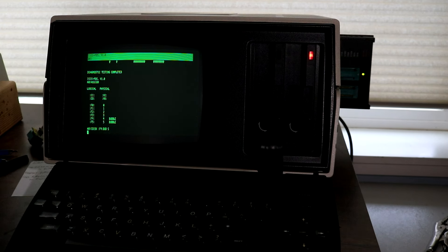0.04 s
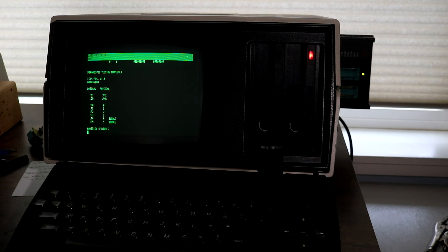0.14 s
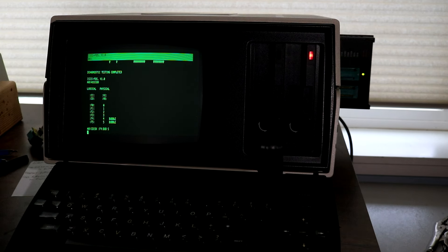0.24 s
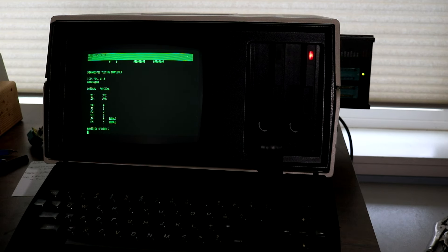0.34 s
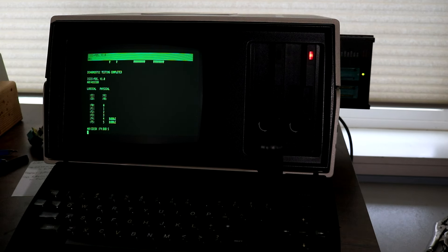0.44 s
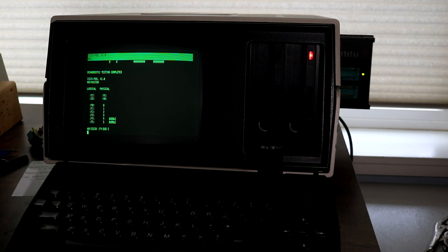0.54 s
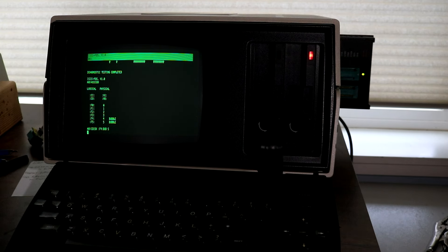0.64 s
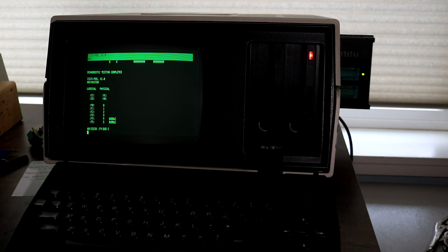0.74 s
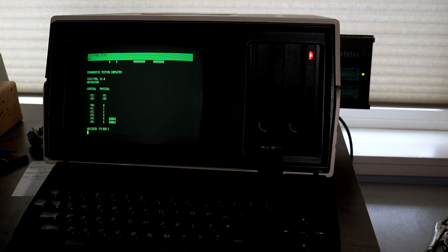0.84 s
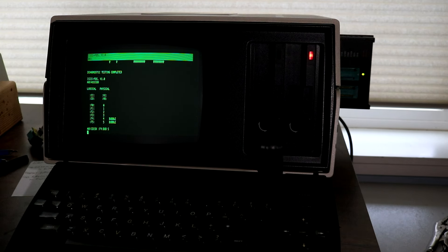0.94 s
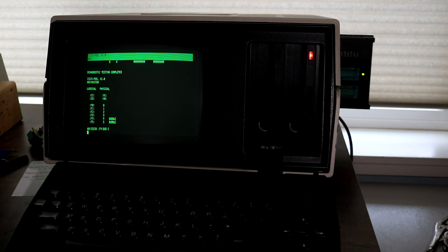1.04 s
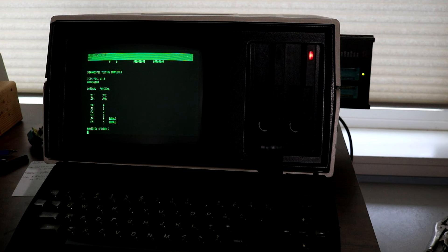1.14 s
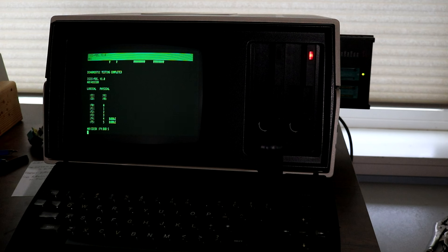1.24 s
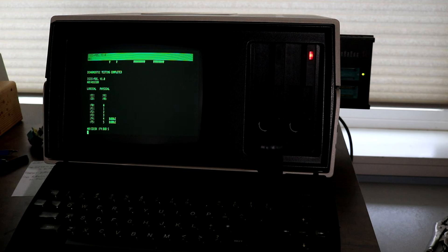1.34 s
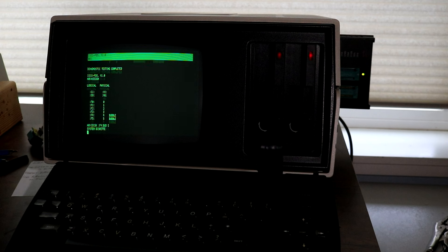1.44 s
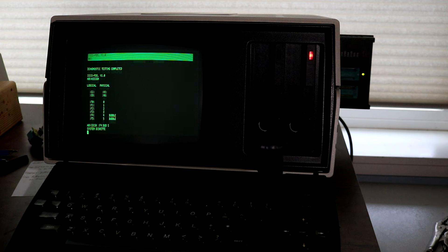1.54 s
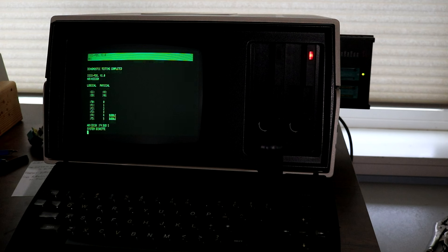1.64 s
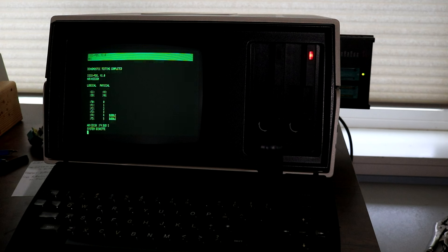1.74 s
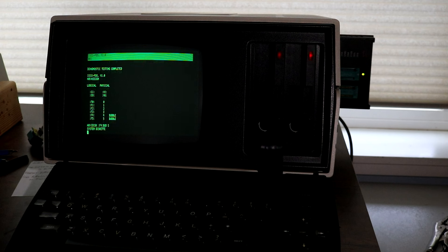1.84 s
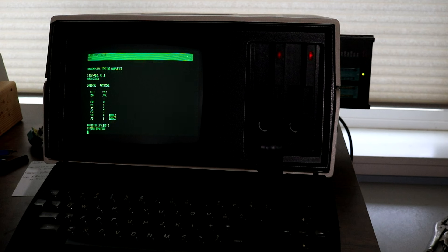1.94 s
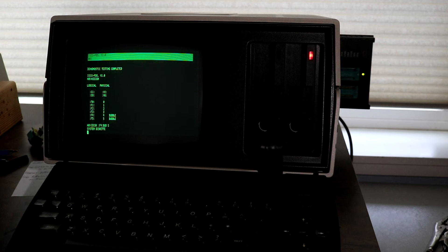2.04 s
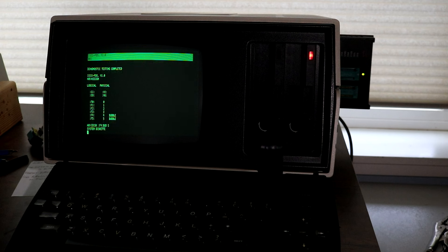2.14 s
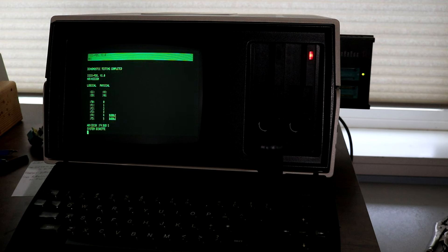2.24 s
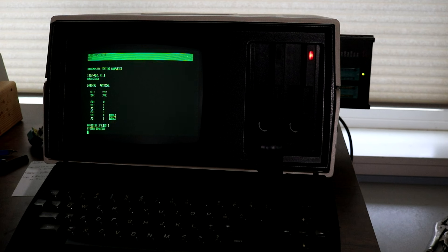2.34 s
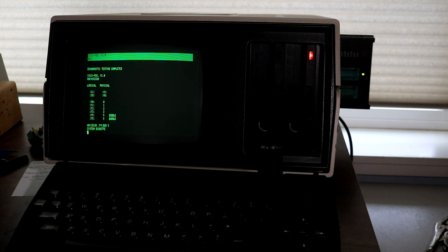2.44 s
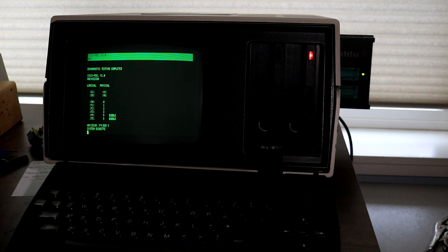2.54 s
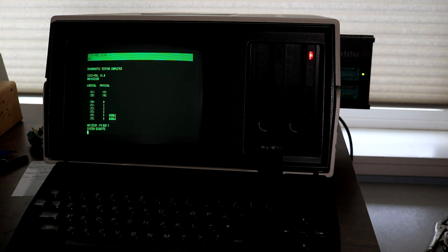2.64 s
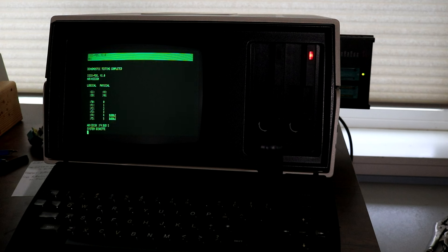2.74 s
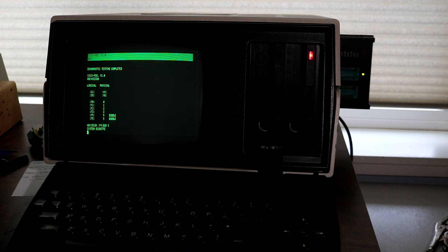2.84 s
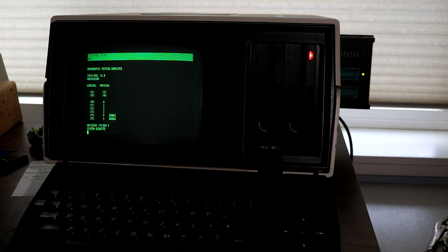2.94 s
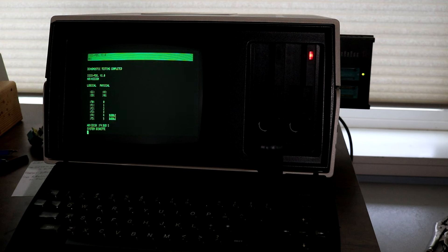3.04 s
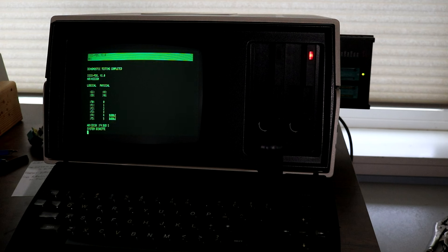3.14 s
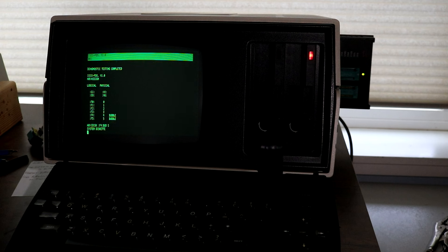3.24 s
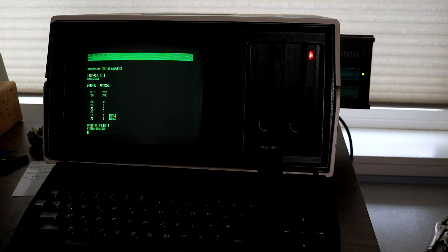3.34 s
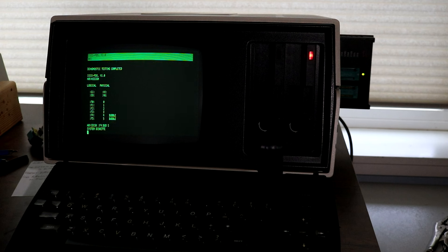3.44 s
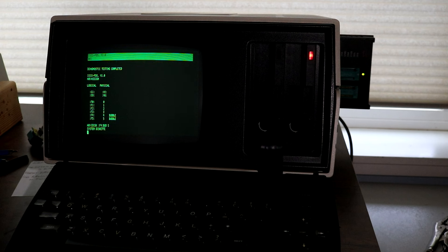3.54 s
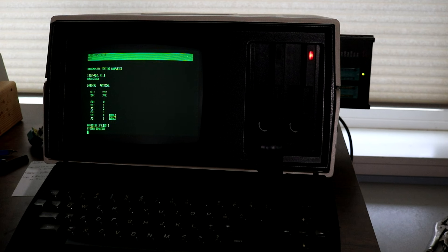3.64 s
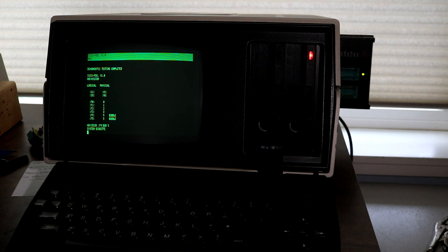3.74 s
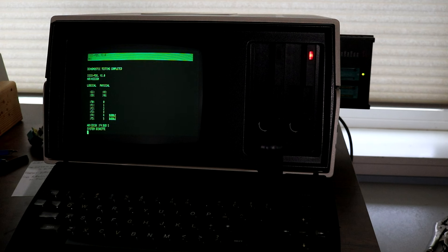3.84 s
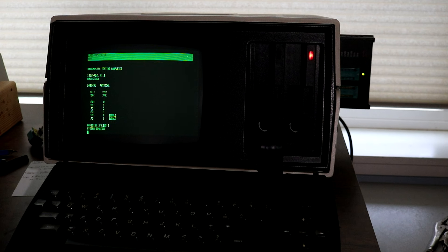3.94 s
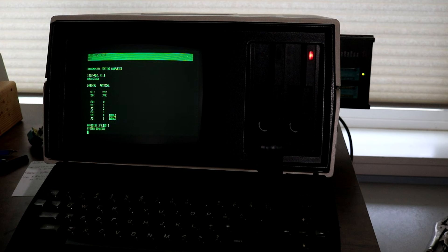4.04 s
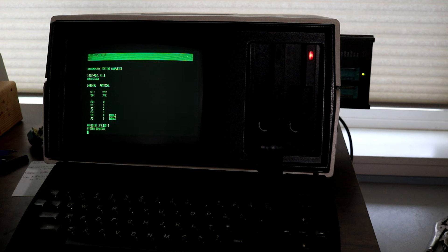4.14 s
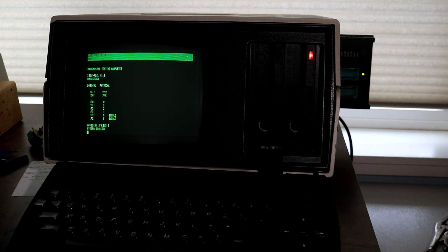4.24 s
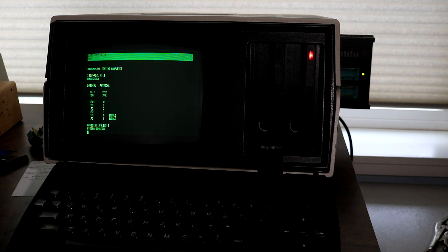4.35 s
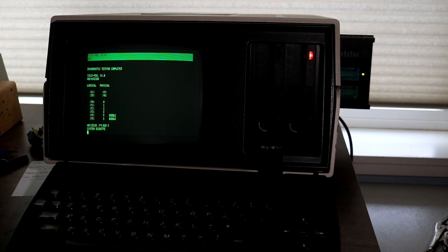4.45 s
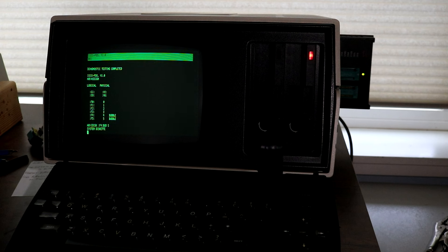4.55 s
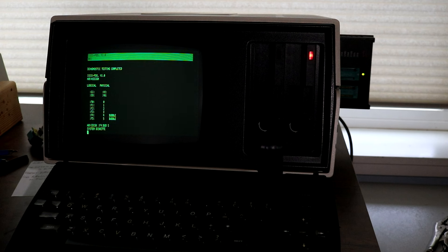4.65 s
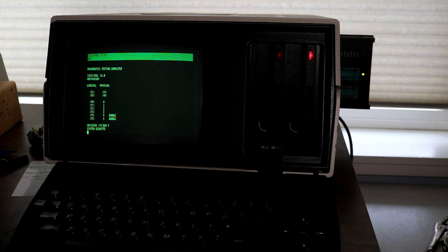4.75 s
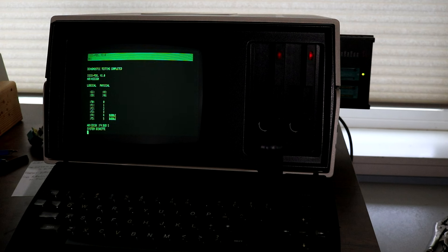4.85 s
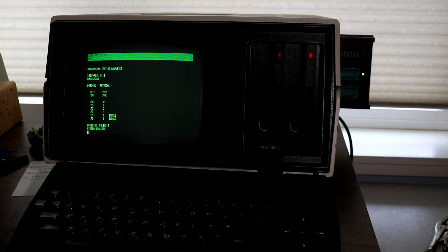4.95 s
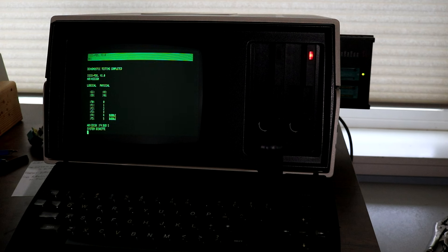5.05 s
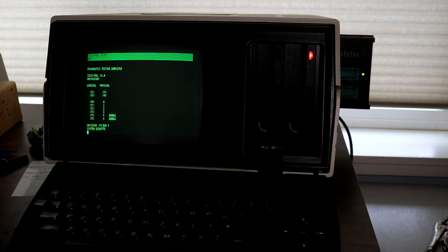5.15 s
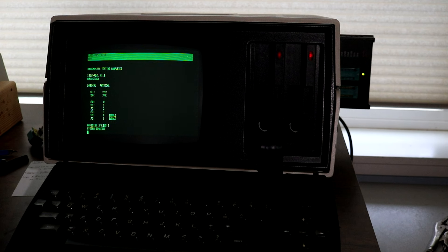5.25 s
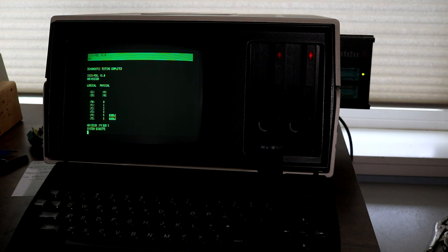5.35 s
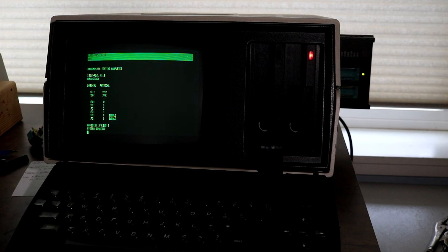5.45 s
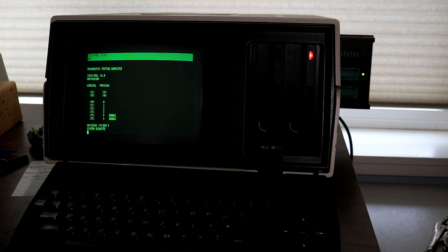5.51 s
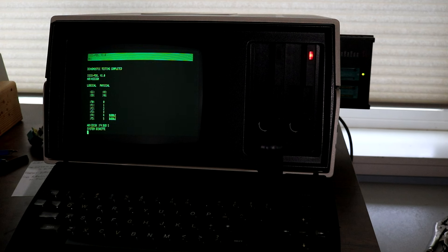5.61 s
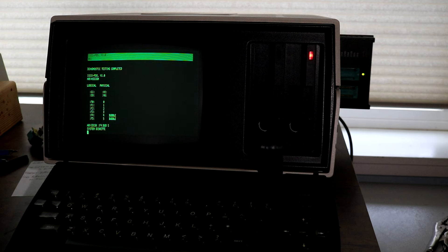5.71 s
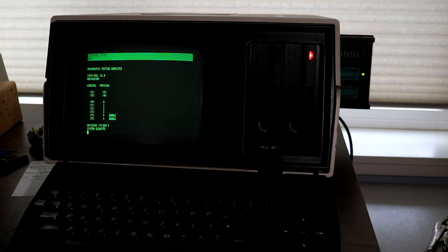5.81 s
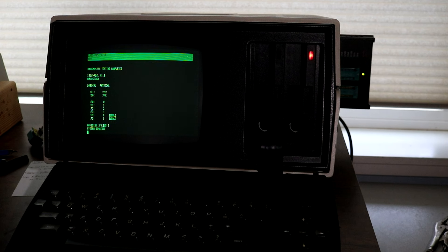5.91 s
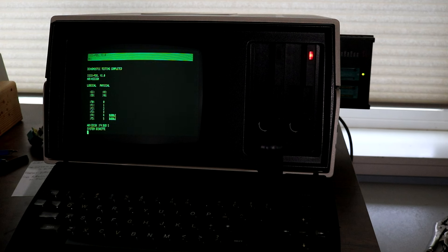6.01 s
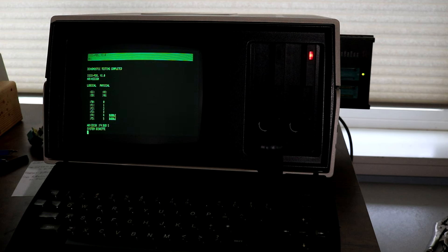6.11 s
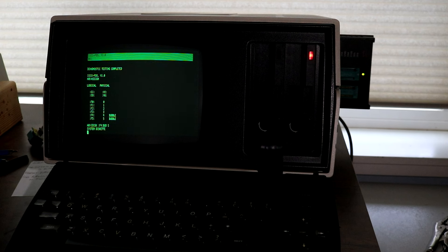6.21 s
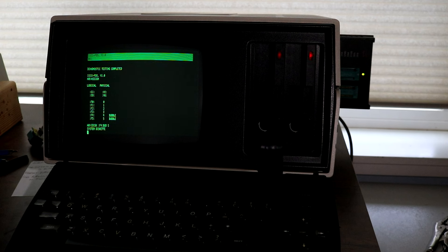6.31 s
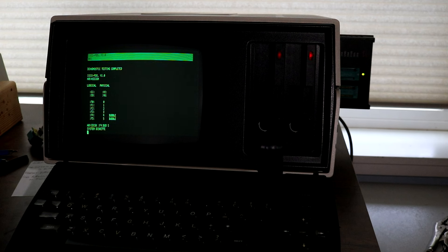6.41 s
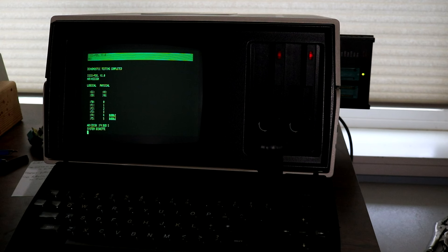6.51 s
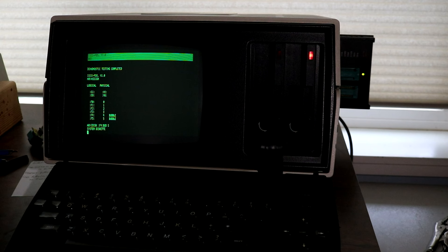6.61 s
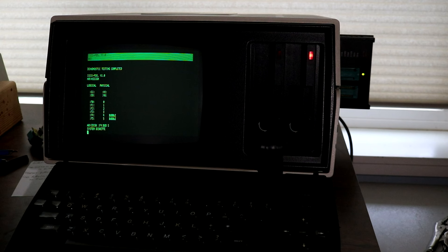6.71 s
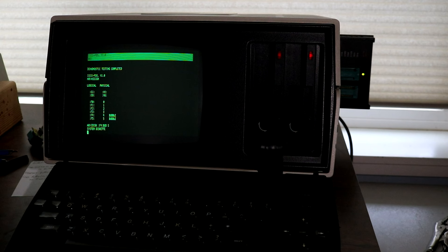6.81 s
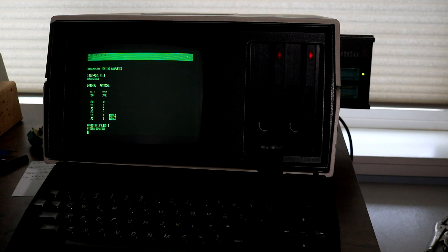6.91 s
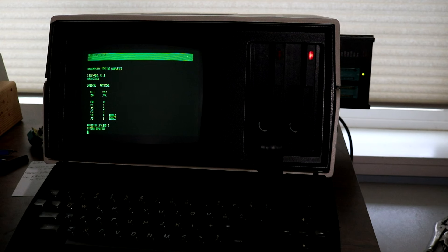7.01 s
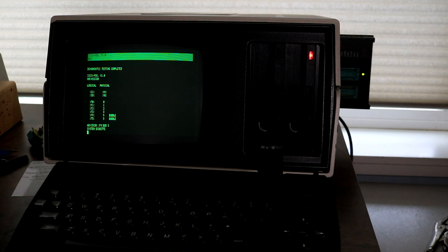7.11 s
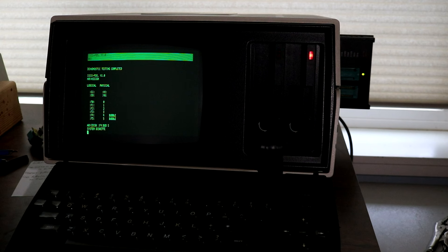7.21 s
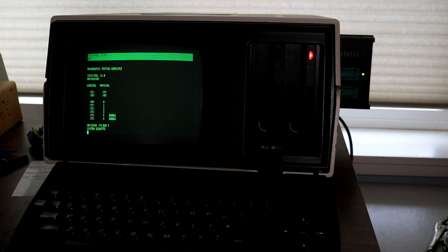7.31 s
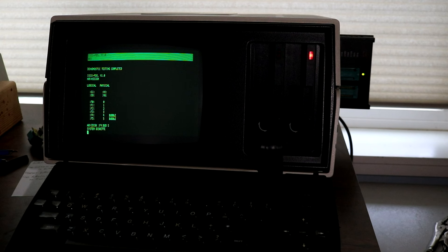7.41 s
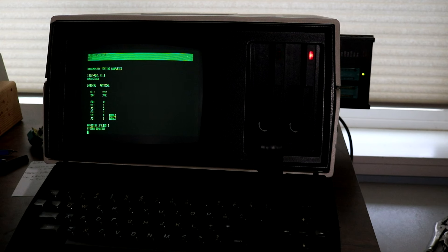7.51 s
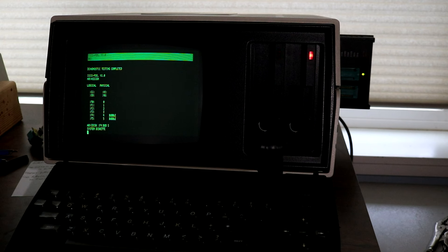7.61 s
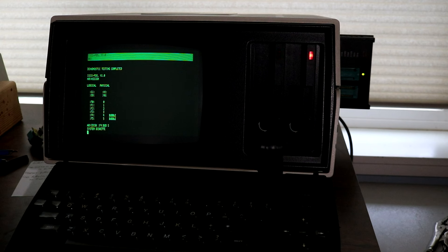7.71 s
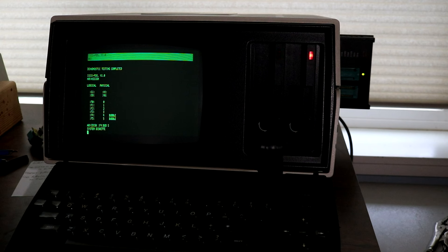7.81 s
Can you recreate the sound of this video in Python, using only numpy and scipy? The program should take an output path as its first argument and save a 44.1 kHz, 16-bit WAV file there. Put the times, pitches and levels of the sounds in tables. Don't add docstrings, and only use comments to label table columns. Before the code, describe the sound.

An old portable computer's floppy drive gives short buzzing seeks ending in sharp loud clacks, over steady fan rush, faint hum and high screen whine.

```python
import sys
import numpy as np
from scipy import signal
from scipy.fft import rfft, irfft, next_fast_len
from scipy.io import wavfile
from scipy.ndimage import uniform_filter1d

SR = 44100
rng = np.random.default_rng(int(sys.argv[2]) if len(sys.argv) > 2 else 0)


def output_pcm(signal):
    pcm = np.clip(np.atleast_2d(signal).T, -1, 1) * 32767
    wavfile.write(sys.argv[1], SR, np.round(pcm).astype(np.int16))


def elevation(decibels):
    levels = np.asarray(decibels, float)
    return 10 ** (levels / 20)


N = 347067


def evened(x):
    return x / np.sqrt(np.mean(x ** 2) + 1e-20)


def read(points, hz):
    f, value = np.transpose(points)
    return np.interp(np.log(hz + 1), np.log(f + 1), value)


def add(mix, s, sound):
    part = mix[round(s * SR):][:len(sound)]
    part += sound[:len(part)]


def colour(x, points):
    hz = np.fft.rfftfreq(x.shape[-1], 1 / SR)
    return irfft(rfft(x) * elevation(read(points, hz)), x.shape[-1])


def ring(x, hz, width):
    return signal.lfilter(*signal.iirpeak(hz, hz / max(width, 5), SR), x)


def drift(count, hz):
    return evened(signal.lfilter(*signal.butter(2, hz, fs=SR), rng.standard_normal(count), axis=-1))


def likeness(z, same):
    same = np.clip(same, -1, 1)[:, None]
    return np.array([z[0], same * z[0] + np.sqrt(1 - same ** 2) * z[1]])


def gate(t, length, rise_s, fall_s):
    rise = 1 - np.exp(-t / max(rise_s, 1e-4))
    return rise * np.exp(-np.maximum(t - length, 0) / max(fall_s, 1e-4))


def monitor():
    whistle_hz = 15600.7
    phase = 2 * np.pi * whistle_hz * np.arange(N) / SR + np.array([[.8], [0]])
    return elevation([[-39.5], [-53.2]] + .2 * drift((2, N), 4)) * np.sin(phase)


# pitch_hz, level_db per Hz
FAN_COLOUR = [(15, -55.5), (25, -41), (63, -18.5), (95, -7), (127, -5), (189, -10), (240, -8), (934, -14),
              (1040, -13.5), (1590, -21), (2190, -20.5), (2710, -24.5), (9990, -35), (14500, -36.5)]
# pitch_hz, likeness (0 to 1)
FAN_COHERENCE = [(60, 0.86), (180, 0.86), (550, 0.75), (1650, 0.026), (4970, 0.026), (15000, 0.2)]
# pitch_hz, left_minus_right_db
FAN_BALANCE = [(60, -4), (400, -1), (1300, -2.5), (2400, -3.5), (4400, -1.5), (8000, 0.5)]


def fan():
    rush_db, hum_hz = -46.5, 120
    frames, hz = N // 512 + 5, np.fft.rfftfreq(2048, 1 / SR)
    a, b, c, d, patches = rng.standard_normal((frames, 1025, 5)).T
    patches = evened(uniform_filter1d(uniform_filter1d(patches, 14, 0), 6, 1))
    z = likeness([a + 1j * b, c + 1j * d], read(FAN_COHERENCE, hz))
    z = z * elevation(read(FAN_COLOUR, hz)[:, None] + 0.61 * patches)
    z *= elevation(np.outer([.5, -.5], read(FAN_BALANCE, hz)))[:, :, None]
    rush = elevation(rush_db) * evened(signal.istft(z, nperseg=2048, noverlap=1536)[1][:, :N])
    duct = elevation(-51) * evened(ring(ring(rng.standard_normal(N), 171, 37), 171, 37))
    hum = elevation(-47 + 0.71 * drift(N, 4.8)) * np.sin(2 * np.pi * hum_hz * np.arange(N) / SR)
    return rush + (hum + duct) * elevation([[-.5], [.5]])


# start_s, length_s, level_db
STROKES = [
    (0.268, 0.12, -51),
    (.36, 0.29, -52),
    (.58, 0.21, -57),
]
# pitch_hz, level_db per Hz
SKIN_COLOUR = [(2000, -23), (4000, -6), (7000, -6.5), (12000, -7), (16000, -7.5)]
# start_s, level_db (peak), pitch_hz (centre), t60_s, ringing_share
TICKS = [
    (0.072, -34, 4400, 0.032, 3),
    (0.2543, -21, 8000, 0.067, 1.7),
    (0.2655, -19.5, 9100, 0.029, 1.7),
    (0.601, -37.5, 7870, 0.05, 2.5),
    (4.737, -36.5, 3480, 0.05, 1.5),
    (7.6714, -51, 3880, 0.05, 2.5),
]
# start_s, level_db (peak), pitch_hz (centre), t60_s, ringing_share
KEY_BODY = [
    (.077, -32.5, 750, 0.11, 30),
    (.258, -35.5, 1610, 0.11, 30),
]
# pitch_hz, level_db per Hz
PLASTIC_COLOUR = [(500, -30), (900, -3), (1600, -4), (3000, 4), (6500, 6), (9500, 5), (15000, -5.5)]


def hand():
    s, length, db = np.transpose(STROKES)[:, :, None]
    done = np.clip((np.arange(N) / SR - s) / length, 0, 1)
    slide = evened(colour(rng.standard_normal((2, N)), SKIN_COLOUR))
    out = slide * (elevation(db) * np.sin(np.pi * done ** 0.57)).sum(0)
    t = np.arange(4000) / SR
    for s, db, hz, t60, share in [*TICKS, *KEY_BODY]:
        burst = rng.standard_normal((2, len(t))) + 0.43 * rng.standard_normal(len(t))
        burst = evened(colour(burst, PLASTIC_COLOUR)) + share * ring(burst, hz, hz / 9)
        envelope = elevation(db - 8.0 - 60 * t / t60) * np.minimum(t / 0.0013, 1)
        add(out.T, s, (envelope * evened(burst)).T)
    return out


# pitch_hz, t60_s
ROOM_DECAY = [(250, 0.49), (1000, 0.39), (2000, 0.33), (4000, 0.33), (8000, 0.29), (14000, 0.19)]
# pitch_hz, likeness (0 to 1)
ROOM_COHERENCE = [(300, 1), (800, 0.34), (2000, 0), (5000, 0)]


def room(x):
    taps = np.zeros((2, SR // 2))
    at = np.arange(200, SR // 2 - 20, 20)
    at = at + rng.integers(0, 20, (2, len(at)))
    np.put_along_axis(taps, at, rng.choice([-1., 1.], at.shape), 1)
    hz, t, z = signal.stft(taps, SR, nperseg=256)
    decay = elevation(-60 * t / read(ROOM_DECAY, hz)[:, None])
    tail = signal.istft(likeness(z, read(ROOM_COHERENCE, hz)) * decay, SR, nperseg=256)[1]
    return signal.fftconvolve(x[None], tail / np.linalg.norm(tail[0]), axes=1)[:, :N]


# pitch_hz, left_minus_right_db
DRIVE_BALANCE = [(300, 0), (700, -2), (1300, -1.5), (2400, -5.5), (4400, -1.5), (8000, -4)]
# pitch_hz, lag_rad
DRIVE_LAG = [(300, 0), (1000, .25), (2500, .7), (4000, .75), (6500, 1.75), (10000, 2.2)]
# pitch_hz, level_db
DESK_SCATTER = [(1000, -16), (3000, -13), (6500, -9), (11000, -6)]


def placed(x):
    size = next_fast_len(N)
    hz = np.fft.rfftfreq(size, 1 / SR)
    half = elevation(read(DRIVE_BALANCE, hz) / 2)
    scatter = rng.standard_normal((2, 600)) * np.exp(-np.arange(600) / 130)
    scatter = rfft(scatter / np.linalg.norm(scatter[0]), size) * elevation(read(DESK_SCATTER, hz))
    gains = np.array([half * np.exp(-1j * read(DRIVE_LAG, hz)), 1 / half]) * (1 + scatter)
    return irfft(rfft(x, size) * gains, size)[:, :N]


# pitch_hz, width_hz, level_db
PLATE_MODES = [(2600, 83, -60), (2800, 580, -53), (3655, 97, 21.5), (4050, 108, 16.5), (4530, 220, 16),
               (5400, 210, 25.5), (6140, 180, 5), (6990, 240, 20.5), (9100, 500, -1.5), (10800, 600, 17.5)]
# start_s, level_db
BOUNCES = [
    (0, -20),
    (.0005, -7),
    (.001, -5),
    (.0018, 0),
    (.0028, -5),
    (.0038, -8),
]
# pitch_hz, level_db per Hz
CLACK_COLOUR = [(900, -23), (1500, -22), (2500, -13), (4000, -10), (7000, -10.5), (10000, -16),
                (15000, -24)]


def clack():
    t, blows = np.arange(2500) / SR, np.zeros(300)
    for s, db in BOUNCES:
        add(blows, s, elevation(db) * np.hanning(5))
    plate = sum(elevation(db) * np.exp(-np.pi * w * t) * np.sin(2 * np.pi * f * t) for f, w, db in PLATE_MODES)
    sound = np.convolve(blows, plate)[:len(t)]
    sound = signal.lfilter(*signal.butter(4, 2100, "high", fs=SR), sound)
    shudder = evened(colour(rng.standard_normal(len(t)), CLACK_COLOUR))
    shudder = shudder * np.minimum(t / .001, 1) * np.exp(-t / .007)
    crack = colour(1. * (np.arange(len(t)) == 90), CLACK_COLOUR)
    crack *= np.linalg.norm(shudder) / np.linalg.norm(crack)
    return sound / abs(sound).max() + .27 * shudder, crack + .3 * shudder


# multiple (of the four-step cycle), level_db
TONES_OUT = [(7, -24), (8, -3), (9, -18), (10, -7), (11, -10), (12, 4), (13, -7.5), (14, -8), (15, -26),
             (16, -10), (17, -10), (18, -1), (19, -6), (20, 0.5), (21, 2.5), (22, -5), (23, -17),
             (24, -1.5), (25, -3.5), (26, -6), (27, -3), (28, -6.5), (29, -7), (30, -12)]
# multiple (of the four-step cycle), level_db
TONES_IN = [(7, -30), (8, -4), (9, -17), (10, -16), (11, -15.5), (12, -4), (13, -10), (14, -15), (15, -25),
            (16, -1.5), (17, -17), (18, -2), (19, -15.5), (20, 1.5), (21, -15), (22, -13), (23, -13),
            (24, -14), (25, -3), (26, -7), (27, -4), (28, -5), (29, -13.5), (30, -5.5)]
# pitch_hz, level_db per Hz
RATTLE_COLOUR = [(880, -34), (1500, -3), (1950, -18.5), (2360, -1), (2650, -6.5), (3470, -8), (4120, -11.5),
                 (5300, -9), (8180, -12.5), (11000, -19.5), (12700, -18), (14600, -25), (15000, -25.5)]
# pitch_hz, level_db per Hz
BUZZ_COLOUR = [(240, -47), (400, -11), (492, -11.5), (601, -23), (631, -8.5), (1000, -3), (1950, -14.5),
               (2200, -6.5), (2860, -42), (4840, -120)]
# pitch_hz, width_hz, level_db (over the rattle)
CHASSIS_MODES = [(2334, 180, -3.5), (2870, 90, -5.5), (4040, 570, -3), (6750, 67, -29), (7700, 250, -13.5)]
# rattle_db, buzz_db, tone_db, lock_in_s (rotor), swell_db (buzz near the stop)
WAYS = [
    (-28.5, -25, -37.5, .06, 4),
    (-29.5, -26, -43.5, 0.024, 7.5),
    (-28.5, -25, -54, 0.02, 9),
]


def head_move(length, drive_db, way, tones):
    cycle_hz = 40.67
    rattle_rise_s, rattle_fall_s, buzz_rise_s, buzz_fall_s = 0.0045, 0.0042, 0.0095, 0.016
    jolt_db, jolt_s = 3, 0.023
    sag_db, sag_s, swell_s = -10, 0.069, 0.071
    rattle_db, buzz_db, tone_db, lock_s, swell_db = way
    t = np.arange(round((length + .05) * 200) * SR // 200) / SR
    rattle_db = rattle_db + jolt_db * np.exp(-t / jolt_s)
    travel = 1 - np.exp(-t / sag_s)
    buzz_db = buzz_db + travel * (sag_db + swell_db * np.exp(-abs(length - t) / swell_s))

    turns = cycle_hz * t
    multiple, db = np.transpose(tones)[:, :, None]
    slip = .009 * multiple * drift((len(db), len(t)), 15)
    tone = elevation(db) * np.cos(2 * np.pi * (multiple * turns + rng.random(db.shape)) + slip)
    tone = tone.sum(0) / np.sqrt((elevation(db[:7]) ** 2).sum() / 2)

    since_step = (4 * turns) % 1
    knock_db = 0.83 * np.minimum(rng.exponential(1, (2, len(t))), 4)
    knocks = elevation(knock_db) * rng.standard_normal((2, len(t)))
    knocks *= rng.random(knocks.shape) < (900 + 2500 * np.exp(-since_step / .3)) / SR
    step = np.diff(np.floor(4 * turns), prepend=0) > 0
    buzz = evened(colour(evened(knocks[0]) + 1.1 * step, BUZZ_COLOUR))
    rattle = evened(knocks[1]) + 1.1 * rng.standard_normal(len(t)) + 3.3 * step
    rattle = colour(rattle, RATTLE_COLOUR) + sum(elevation(g) * ring(rattle, f, w) for f, w, g in CHASSIS_MODES)

    noisy = elevation(buzz_db - 3.5) * buzz * gate(t, length, buzz_rise_s, buzz_fall_s)
    noisy += elevation(rattle_db) * evened(rattle) * gate(t, length, rattle_rise_s, rattle_fall_s)
    tone = elevation(tone_db) * tone * gate(t, length, lock_s, rattle_fall_s)
    return elevation(drive_db) * np.array([tone, noisy])


# start_s, level_db, direction (0 out, 1 in)
SEEKS = [
    (1.431, 0, 0),
    (1.825, 0.4, 1),
    (4.787, 0.3, 0),
    (5.220, 0.76, 1),
    (6.346, 0.4, 0),
    (6.829, 0.4, 1),
]
# start_s, level_db (peak)
CLACKS = [
    (1.5334, 0),
    (2.0672, -1),
    (5.024, -1),
    (5.4675, 0),
    (6.5939, 0),
    (7.0653, 0),
]
# start_s, level_db
NUDGES = [
    (0.7296, -3),
    (3.529, -2.5),
    (7.5294, -2.5),
]


def drive():
    nudge_s = 0.0116
    near, walls = np.zeros((2, N))
    moves = [(s, stop - s, db, round(way)) for (s, db, way), (stop, _) in zip(SEEKS, CLACKS)]
    for s, length, db, way in moves + [(s, nudge_s, db, 2) for s, db in NUDGES]:
        tone, noisy = head_move(length, db, WAYS[way], (TONES_OUT, TONES_IN, TONES_IN)[way])
        add(near, s, tone + noisy)
        add(walls, s, .25 * tone + noisy)
    near = near + 2.8 * ring(near, 1143, 4.5)
    for s, db in CLACKS:
        ringing, shudder = clack()
        add(near, s + .0005, elevation(db + 13.5) * ringing)
        add(walls, s, elevation(db - 4.5) * shudder)
    return near, walls


def scene():
    (near, walls), fingers = drive(), hand()
    broad = placed(near) + fingers + elevation(-8.0) * room(walls + 1.5 * fingers[0]) + fan()
    return signal.lfilter(*signal.butter(3, 14500, fs=SR), broad) + monitor()


def top_cut(x):
    return signal.sosfilt(signal.butter(12, 16510, fs=SR, output="sos"), x)


def record(dry):
    release_s, edge_hz = .028, 16200
    excess_db = np.maximum(20 * np.log10(abs(dry).max(0) + 1e-9) + 1.5, 1e-6)
    fade = np.arange(N) / (release_s * SR)
    cut_db = np.exp(np.maximum.accumulate(np.log(excess_db) + fade) - fade)
    cut_db = signal.lfilter([.15], [1, .15 - 1], cut_db)
    limited = np.clip(dry / elevation(cut_db), -1, 1)
    low_pass = signal.firwin(255, edge_hz, window=("kaiser", 9), fs=SR)
    return top_cut(signal.oaconvolve(limited, low_pass[None], "same"))


dry = scene()
out = record(dry)
output_pcm(out)
```